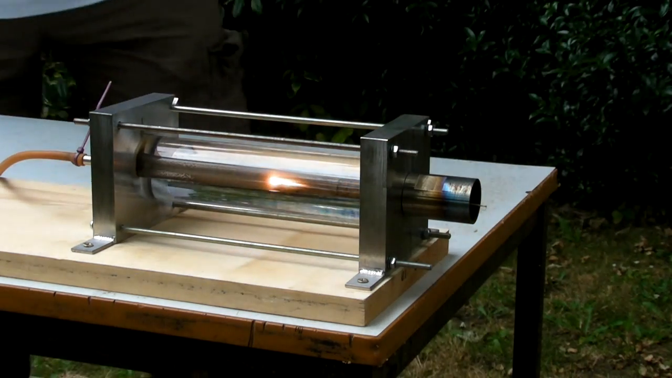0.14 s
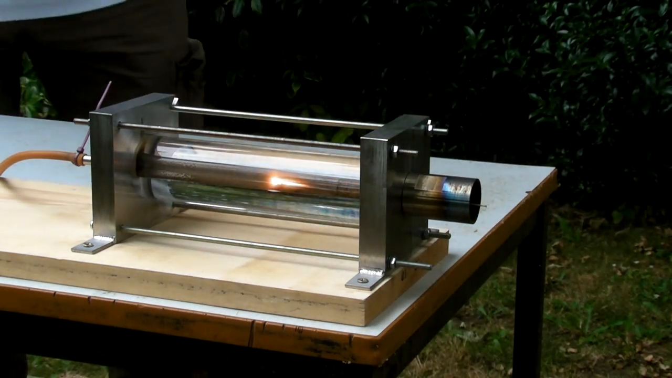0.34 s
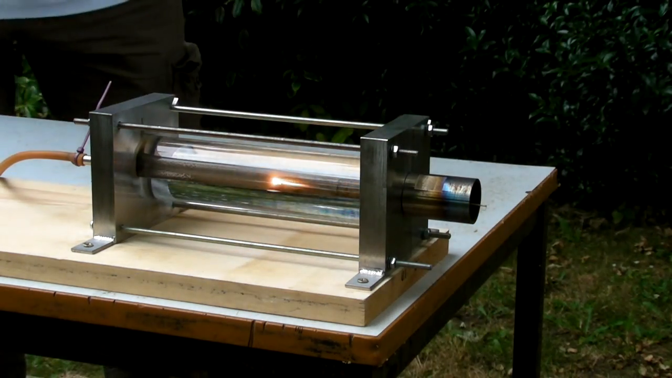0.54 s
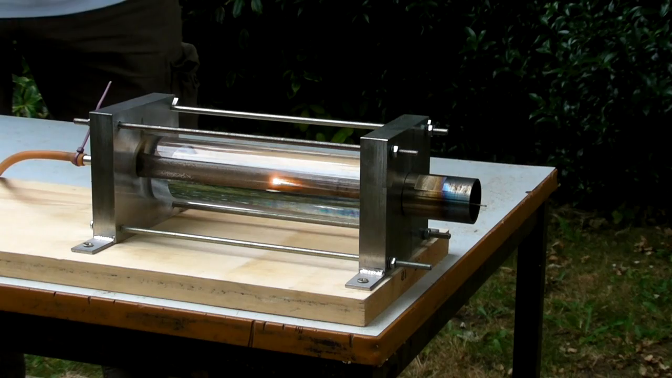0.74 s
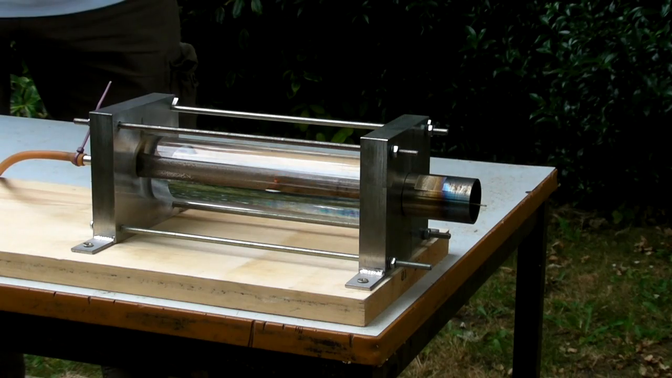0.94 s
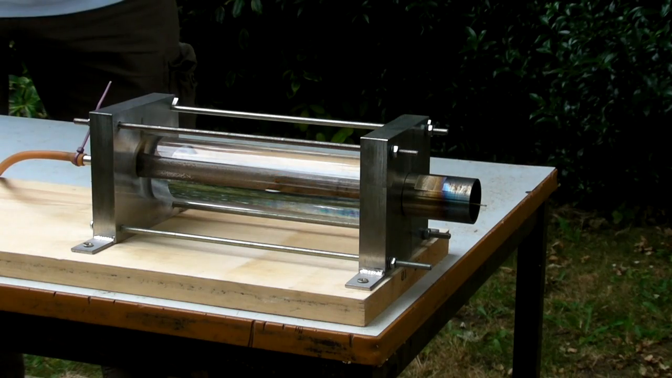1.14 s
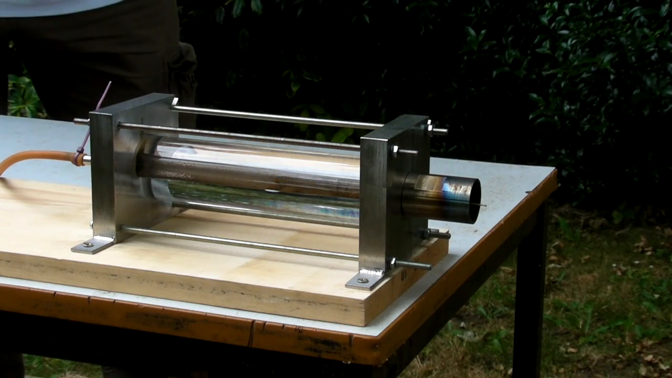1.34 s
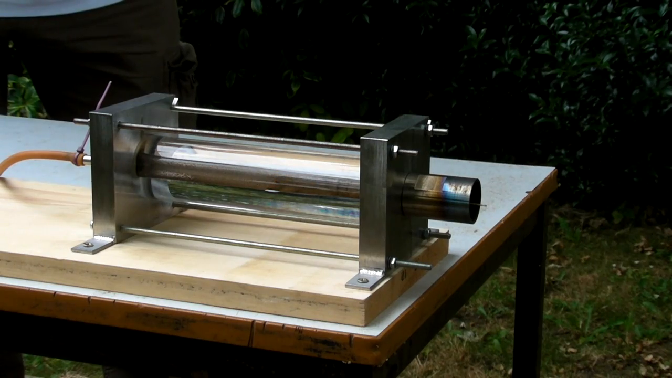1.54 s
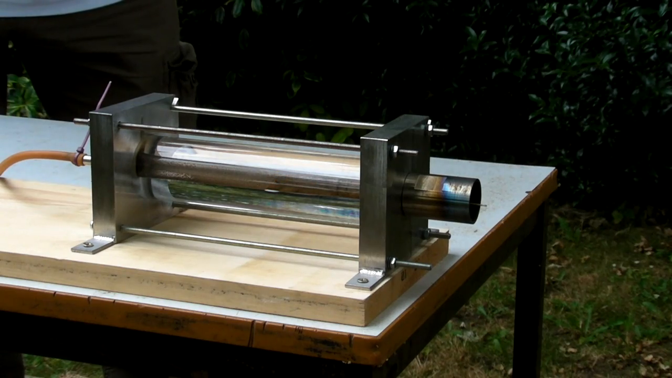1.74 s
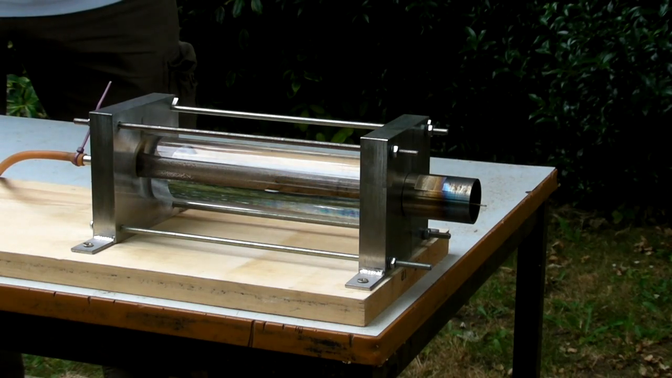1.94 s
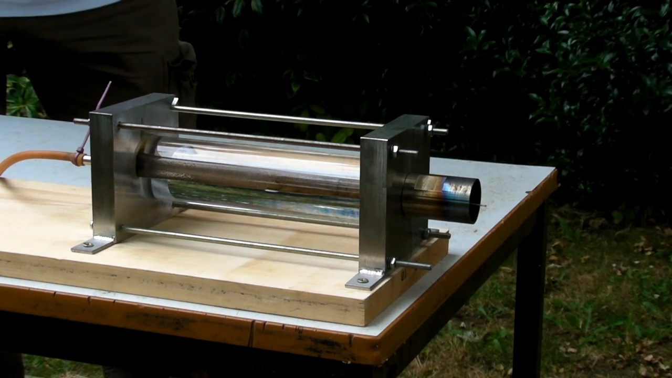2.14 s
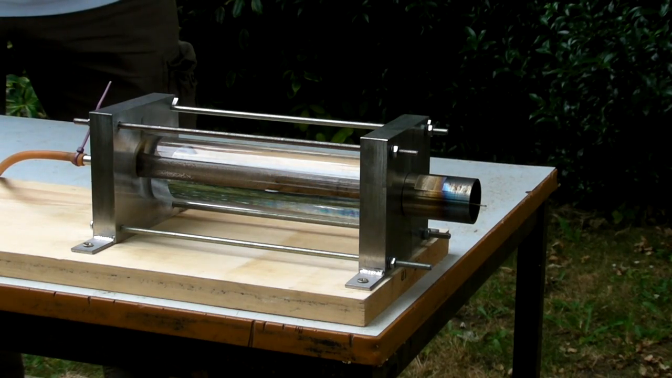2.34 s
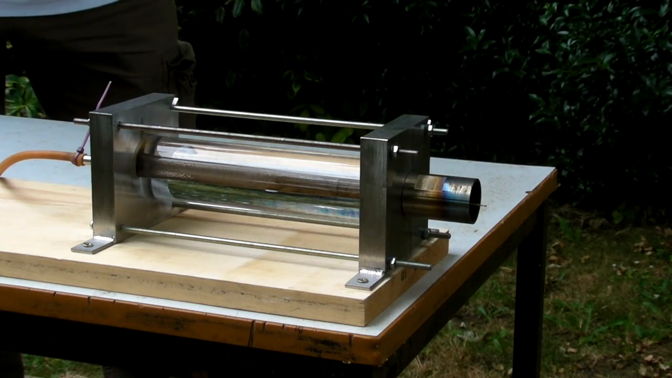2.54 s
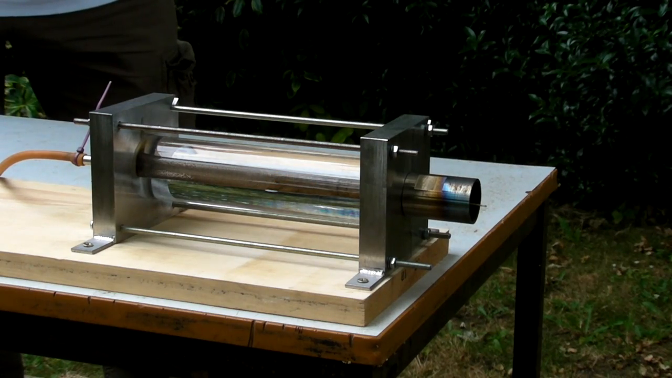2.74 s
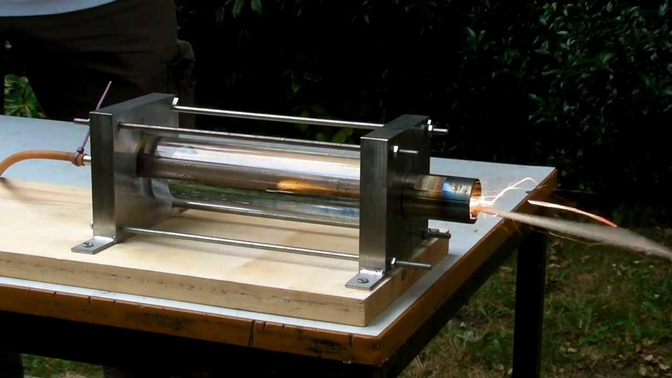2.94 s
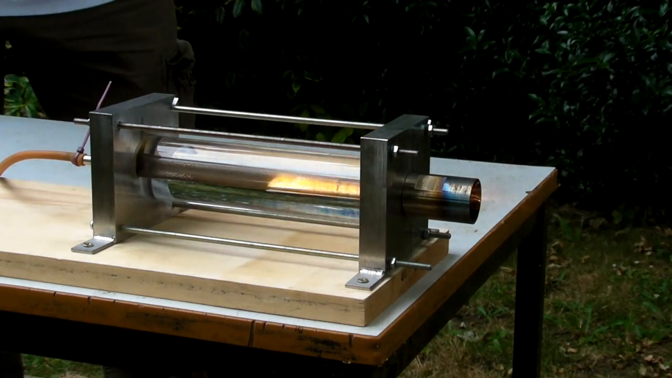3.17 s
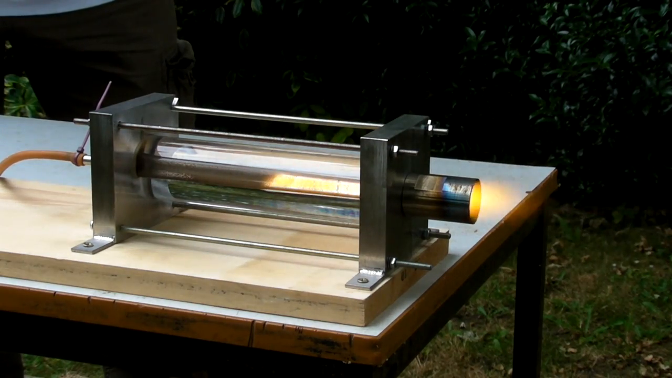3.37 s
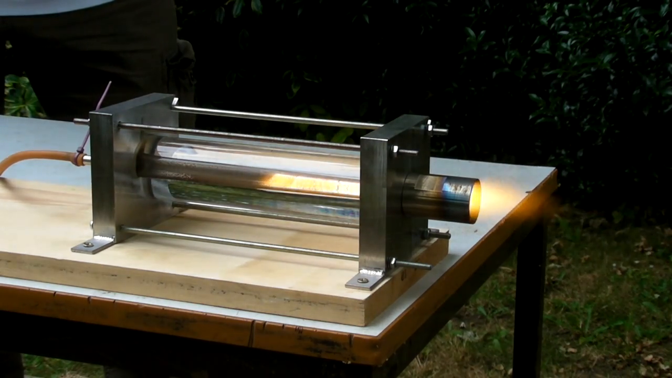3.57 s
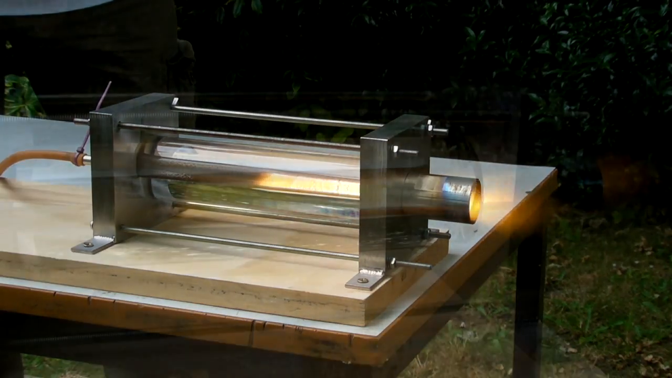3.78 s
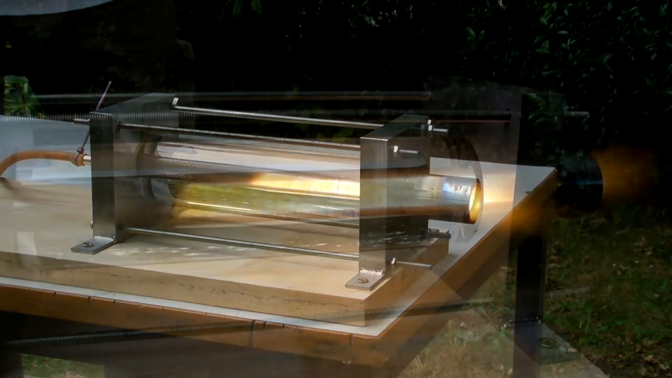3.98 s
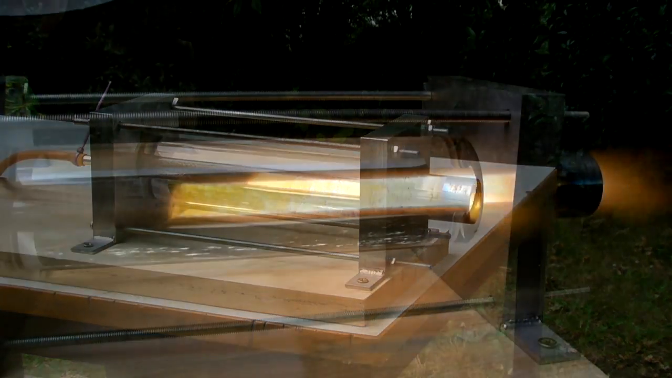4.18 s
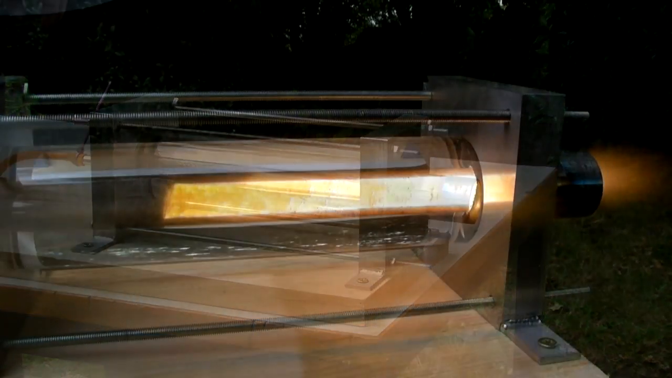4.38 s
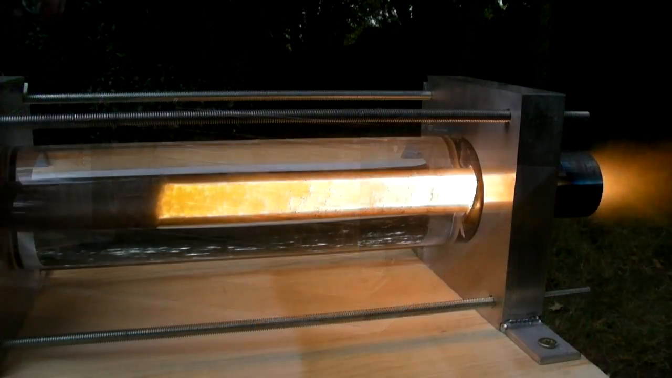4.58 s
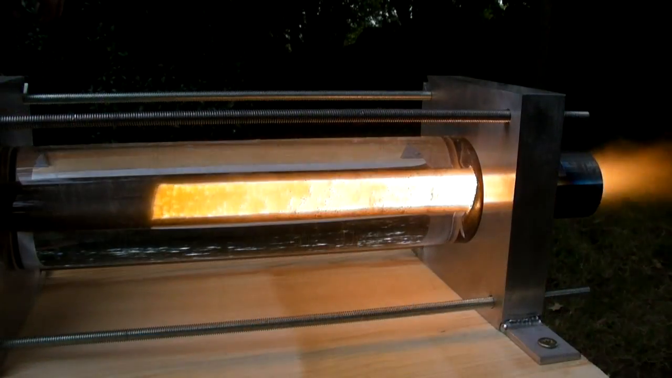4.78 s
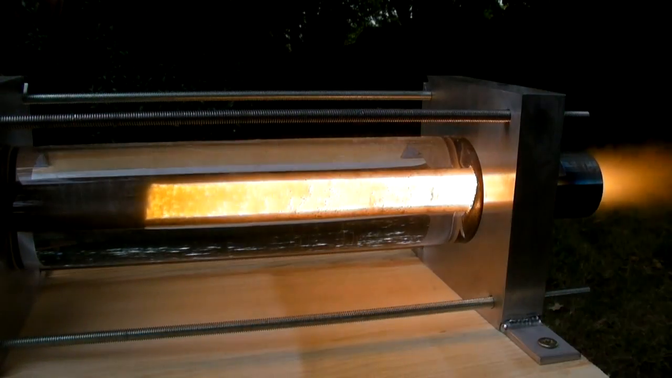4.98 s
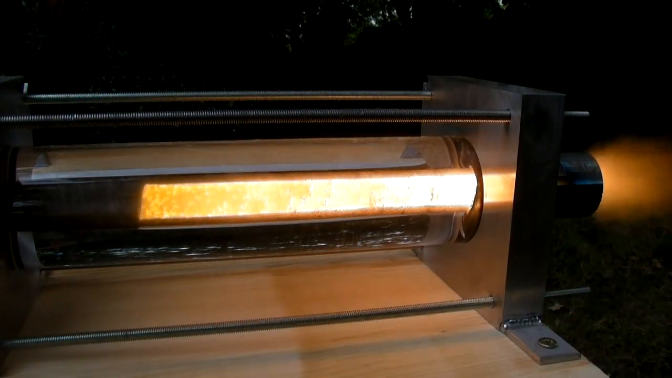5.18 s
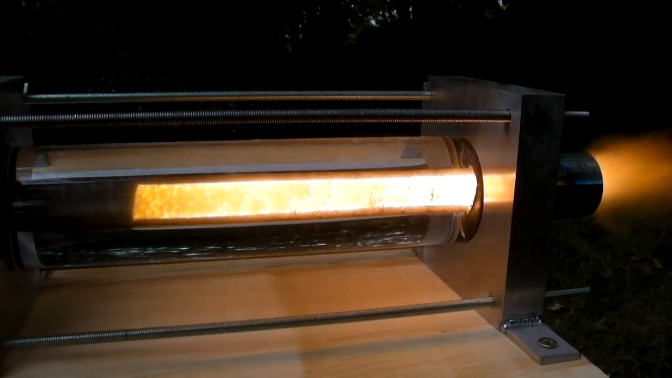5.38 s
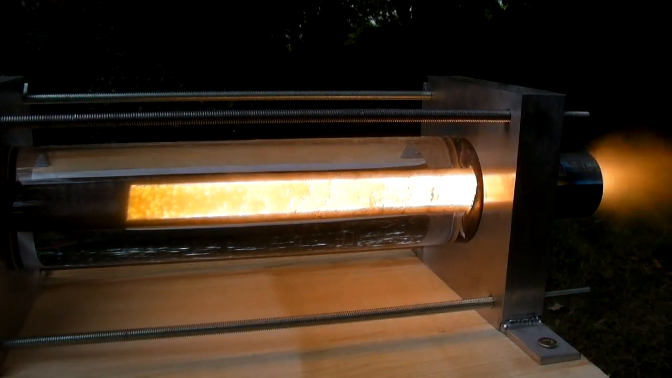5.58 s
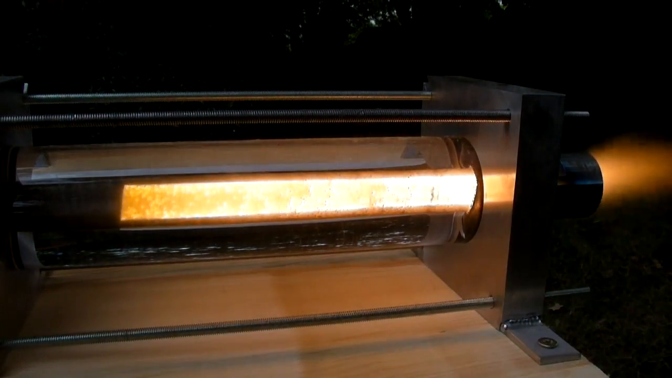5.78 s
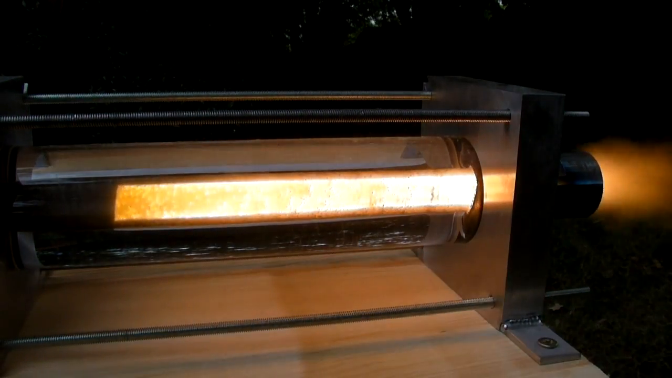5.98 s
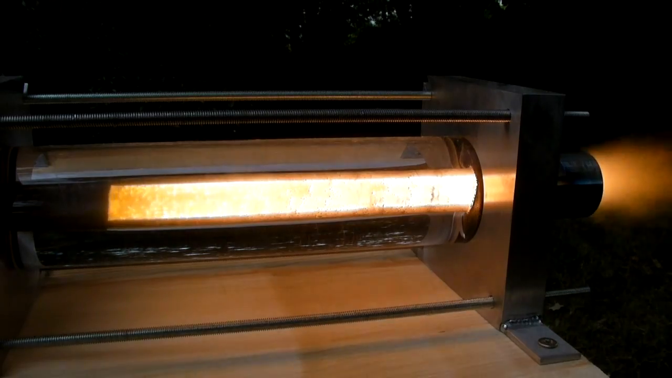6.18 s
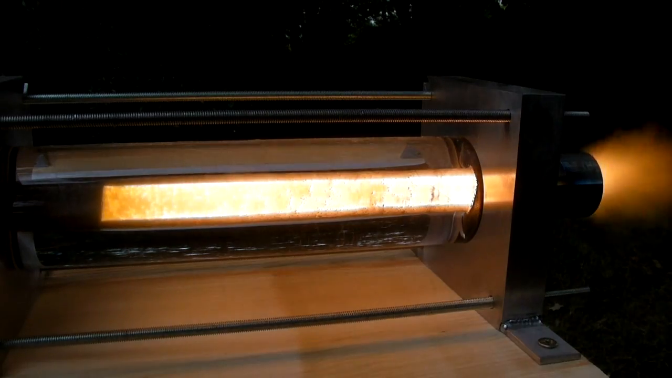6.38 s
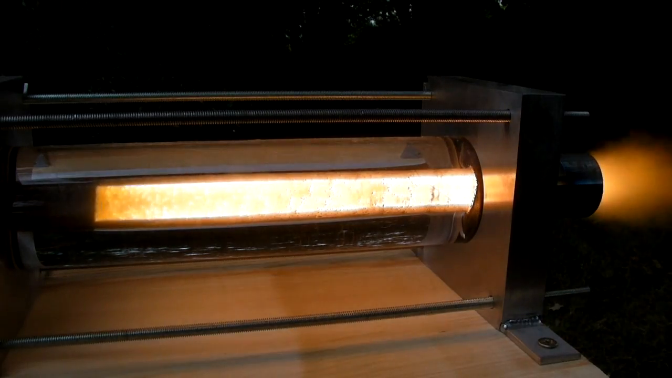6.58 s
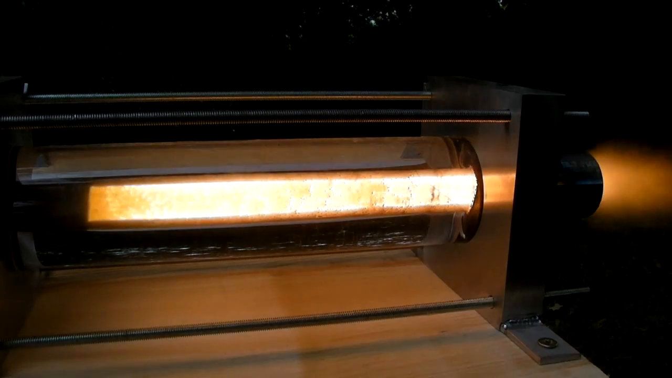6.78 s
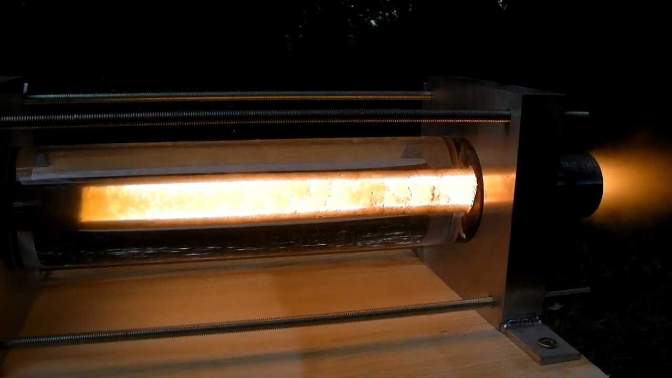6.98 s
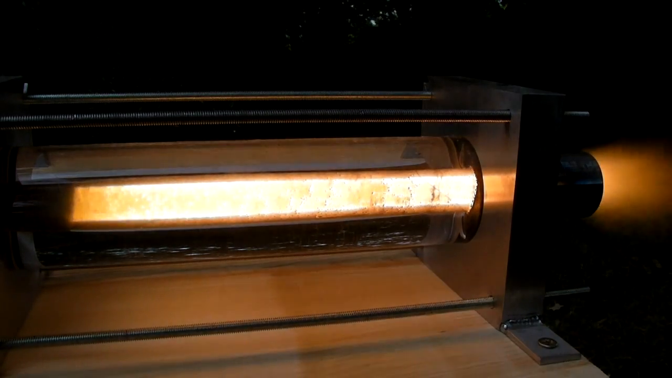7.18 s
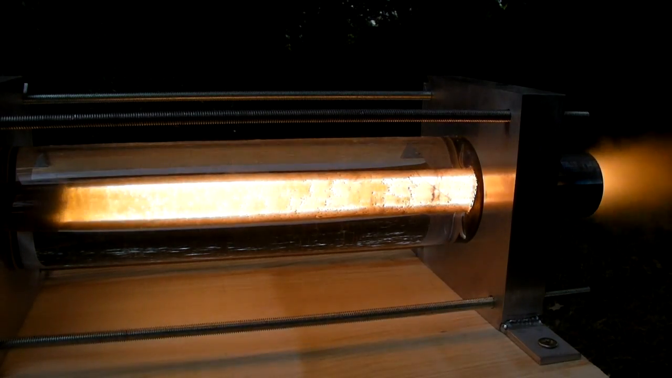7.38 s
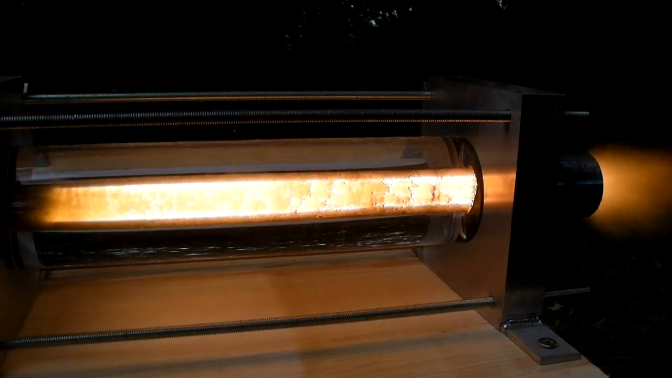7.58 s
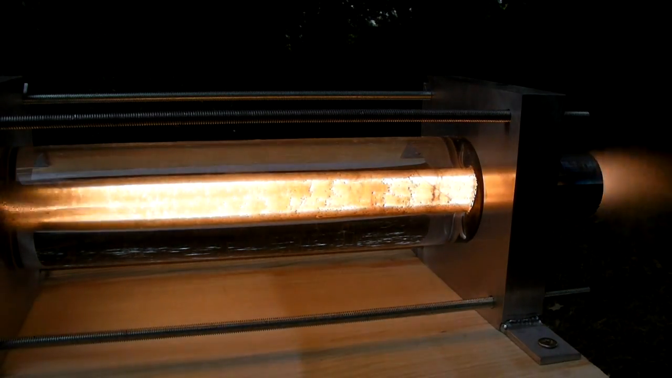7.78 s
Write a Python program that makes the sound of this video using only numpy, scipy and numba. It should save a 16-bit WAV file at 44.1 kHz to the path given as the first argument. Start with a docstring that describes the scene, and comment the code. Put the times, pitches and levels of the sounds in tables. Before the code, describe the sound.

From 0 to 0.5 s, sharp dry crackles and gritty clacks come irregularly close by over very faint traffic and leaves; a few scattered ticks follow until 1 s. Then it is almost silent, with tiny falling bird whistles from 2.2 s and five quick, faint hollow taps near 2.45 s. At 2.9 s a valve clacks and squeals thinly; just after 3 s gas bursts out in a loud puff, drops briefly, then surges and lights by 3.3 s into a harsh, clipped, bright hiss with rumble. A wavering chamber howl, around 700 to 750 Hz, swells in. Between 3.5 and 4.8 s this dissolves into a closer, somewhat quieter flame roar, airy and flickering. Fluttering whistles ride on it, one strong and climbing slowly from 5.4 s, turning rough near 7 s; a higher stuttering whistle joins after 7.15 s. At 7.8 s the whistle flicks upward and everything blasting stops, leaving faint garden air.

```python
"""A garden bench with a small rocket motor: dry crackles (bursts of grit), far birds (gliding tones), soft taps.
A valve clacks and squeals, then gas rushes and lights: noise around a moving peak, with treble and rumble.
The chamber howls on its pipe note. The sound dissolves to a closer spot, where the roar flickers in bands
of noise and the nozzle whistles in fluttering tones. Traffic and leaves lie behind; the camera clips the loudest."""
import sys
import numpy as np
from scipy import signal
from scipy.fft import rfft, irfft
from scipy.io import wavfile
from scipy.ndimage import uniform_filter1d
from numba import njit

SR = 44100
rng = np.random.default_rng(int(sys.argv[2]) if len(sys.argv) > 2 else 0)


def ratio(d):
    """dB to gain"""
    e = np.asarray(d, float) / 20
    return 10 ** e


def materialize(psi):
    """Save the field psi as 16-bit PCM at rate SR to the path in sys.argv[1].

    A 1-D psi becomes a single channel; in a 2-D psi each row is a channel.
    """
    bounded = np.clip(np.atleast_2d(psi).T, -1, 1)
    quanta = np.round(bounded * 32767).astype(np.int16)
    wavfile.write(sys.argv[1], SR, quanta)


N = 344862
T = np.arange(N) / SR
FREQS = np.maximum(np.arange(N // 2 + 1) * SR / N, 1)

# How the close roar moves, shared with the whistles that ride on it.
# columns: time_s, level_db, treble_db (against the level)
ROAR_MOVES = [(3.8, -17, -3), (4.52, -22.5, -2), (4.67, -19.5, -2), (5.08, -21, 1), (5.34, -24.5, -1),
              (5.43, -23, 2), (5.47, -20, 0), (5.65, -22.5, -0.5), (5.75, -18, -0.5), (5.89, -24.5, 0.5),
              (6.1, -19, -4.5), (6.22, -23, -1.5), (7.05, -19, -2), (7.46, -23.5, 2), (7.82, -18.5, -5.5)]


def unit(x):
    """Scale to rms 1."""
    return x / np.sqrt(np.mean(x ** 2))


def shape(points):
    """Gain at every frequency from (Hz, dB) points."""
    hz, db = np.transpose(points)
    return ratio(np.interp(np.log(FREQS), np.log(hz), db))


def colour(x, points):
    """Filter by (Hz, dB) points."""
    return irfft(rfft(x) * shape(points), N)


def hiss(points):
    """Noise of rms 1 with the given spectrum."""
    return unit(colour(rng.standard_normal(N), points))


def curves(table):
    """A gate that is open while the table lasts, then each column over time."""
    s, *columns = np.transpose(table)
    edge_s = .004
    gate = np.clip(np.minimum(T - s[0], s[-1] + edge_s - T) / edge_s, 0, 1)
    return [gate] + [np.interp(T, s, c) for c in columns]


def ramp(start_s, end_s):
    """0 before, 1 after, straight between."""
    return np.clip((T - start_s) / max(end_s - start_s, 1e-3), 0, 1)


@njit
def svf(x, hz, width):
    """State-variable band-pass with moving centre and width, gain 1 at the centre."""
    y, b, l = np.empty(len(x)), 0., 0.
    for i in range(len(x)):
        g, k = np.tan(np.pi * hz[i] / SR), width[i] / hz[i]
        v = (b + g * (x[i] - l)) / (1 + g * (g + k))
        b, l, y[i] = 2 * v - b, l + 2 * g * v, k * v
    return y


def band(hz, width_hz):
    """Noise in a moving resonance applied twice, rms near 1."""
    width = np.clip(width_hz, 5, 9000) + 0 * T
    once = svf(rng.standard_normal(N), hz, width)
    return svf(once, hz, width) * np.sqrt(2 * SR / np.pi / width)


def walk(rate):
    """Random levels held 1 / rate s and smoothed twice; spread 1."""
    k = int(SR / rate)
    steps = np.repeat(rng.standard_normal(N // k + 1), k)
    return unit(uniform_filter1d(uniform_filter1d(steps, k), k)[:N])


def echoes(x, table, dull_hz, thin_hz):
    """Direct sound plus short, duller reflections, which comb the spectrum."""
    late = sum(ratio(db) * np.exp(-2j * np.pi * FREQS * ms / 1000) for ms, db in table)
    # soft ground returns less of the bass, and a little early
    comb = 1 + late / np.sqrt(1 + (FREQS / dull_hz) ** 2) / (1 - 1j * thin_hz / FREQS)
    return irfft(rfft(x) * comb, N)


def spread(x, side_points):
    """Left and right differ by a smeared, later copy of the sound."""
    decay_ms = 7.7
    smear = rng.standard_normal(2048) * np.exp(-np.arange(2048) / (decay_ms * SR / 1000))
    late = signal.fftconvolve(x, smear / np.linalg.norm(smear))[:N]
    side = colour(late, side_points)
    return np.array([x + side, x - side])


def garden():
    """Distant traffic and leaves: two filtered noises that swell apart, the bass unevenly."""
    # spectrum of the leaves and air; columns: pitch_hz, level_db (per Hz)
    air = [(20, -28), (60, -4.5), (130, -1.5), (170, -6.5), (600, -9.5), (2500, -14.5), (4300, -16),
           (5100, -21.5), (15500, -31.5)]
    # spectrum of the far traffic; columns: pitch_hz, level_db (per Hz)
    traffic = [(25, -14), (70, 2), (150, 4.5), (260, -27.5)]
    # side against middle; columns: pitch_hz, level_db
    side_tone = [(60, -8), (200, -7), (400, -2), (15000, -0.5)]

    def layer():
        """One draw of air and traffic, each with its own swell."""
        leaves = hiss(air) * ratio(0.34 * walk(5.13))
        return leaves + ratio(-9 + 1.4 * walk(6.9)) * hiss(traffic)

    mid, side = layer(), colour(layer(), side_tone)
    return ratio(-51) * np.array([mid + side, mid - side])


def cracks():
    """Each is a run of grit in a band that starts fast, the long ones more gently, and stops short."""
    # crackles, scrapes and clacks; columns: start_s, level_db, centre_hz, length_ms
    loud_cracks = [(0, -33, 3450, 15), (.027, -33, 4440, 10), (.07, -40, 6900, 27), (.177, -35, 10000, 3),
                   (.195, -31, 5970, 3.8), (.279, -22.5, 2500, 3.8), (.28, -28, 684, 8.5),
                   (.35, -25, 4280, 8.8), (.364, -30, 4900, 3), (.379, -37, 1150, 30),
                   (.379, -34.5, 5900, 55), (.405, -24.5, 1600, 9), (.412, -21.5, 1630, 13),
                   (.425, -23, 3000, 6.3), (.449, -38.5, 4200, 13), (.469, -32, 3000, 4),
                   (.478, -34.5, 3200, 18), (.44, -43, 2500, 60), (.49, -44, 4500, 45),
                   (.592, -35, 3500, 5.1), (.865, -46, 5000, 4.5), (.939, -37.5, 5900, 2.6),
                   (.98, -36, 2100, 4), (1.85, -52, 2500, 76), (2.872, -35, 5984, 26),
                   (2.873, -41, 1800, 22), (2.892, -34, 4000, 6), (2.893, -33, 1250, 6),
                   (2.977, -35, 900, 5), (2.982, -40.5, 846, 59)]
    out, t_ms = np.zeros(N), np.arange(4096) / SR * 1000
    # twelve faint chance crackles rustle among the loud ones, between 0.1 and 1.3 s
    chances = rng.random((12, 4))
    faint = [(.1 + a * 1.2, -53.5 + 4 * b, 4000 + 4000 * c, 3 + 10 * d) for a, b, c, d in chances]
    for s, db, hz, ms in loud_cracks + faint:
        fine, coarse = rng.standard_normal((2, 4096))
        # strong random level swings break the noise into grains, which are then squashed
        grit = np.tanh(fine * ratio(38 * uniform_filter1d(coarse, size=30)) / 6)
        # band width in octaves: 0.87 at 1 kHz, wider for higher cracks
        octaves = max(0.87 + 0.43 * np.log2(hz / 1000), .2)
        half = 2 ** (octaves / 2)
        edges_hz = [hz / half, min(hz * half, SR / 2.2)]
        sos = signal.butter(2, edges_hz, "bandpass", fs=SR, output="sos")
        rise = np.minimum(t_ms / (0.93 + 0.11 * ms), 1)
        fall = ratio(-9 * t_ms / ms - 3 * (t_ms / ms) ** 4)
        tail = ratio(-21.5 - .5 * t_ms)
        hold = rise * fall + tail
        burst = unit(signal.sosfilt(sos, grit * hold)) * np.sqrt(np.mean(hold ** 2))
        out[int(s * SR):int(s * SR) + 4096] += ratio(db) * burst
    return out


def birds():
    """Far, thin falling whistles: gliding sines that flutter and break up."""
    # columns: start_s, length_s, start_hz, end_hz, level_db
    calls = [(2.19, .07, 5250, 4950, -61), (2.49, .06, 6700, 6400, -63), (2.51, .06, 5700, 5550, -58),
             (2.723, .09, 5750, 5700, -60), (2.83, .09, 5720, 5660, -55)]
    out = np.zeros(N)
    for s, length, start_hz, end_hz, db in calls:
        u = np.clip((T - s) / length, 0, 1)
        hz = start_hz + (end_hz - start_hz) * u + 40 * walk(90)
        arch = np.abs(np.sin(np.pi * u)) ** .5 * (u < 1)
        out += ratio(db + 4 * walk(120)) * arch * np.sin(2 * np.pi * np.cumsum(hz) / SR)
    return out


def knocks():
    """A far, hollow object tapped five times, hardest in the middle: dying sines."""
    # ringing notes of the object; columns: pitch_hz, t60_s (time to fall 60 dB), level_db
    ringing = [(1000, 0.017, 6.5), (2500, 0.034, 0)]
    middle_s, gap_s = 2.446, .023
    out = np.zeros(N)
    for k in np.arange(-2, 3):
        t = np.maximum(T - middle_s - k * gap_s, 0)
        tap_db = -45 - 1.1 * k ** 2
        out += sum(ratio(tap_db + db - 60 * t / t60) * np.sin(2 * np.pi * hz * t) for hz, t60, db in ringing)
    return out


def jet():
    """Turbulent jet whose noise peak moves with the flow; treble and rumble come as it lights."""
    # gas flow; columns: time_s, level_db, peak_hz
    flow = [(2.94, -64, 2600), (3.006, -42.5, 2500), (3.024, -20, 2440), (3.064, -7, 2920),
            (3.112, -2.5, 3450), (3.136, -19.5, 2976), (3.155, -15.5, 2900), (3.258, -10, 3200),
            (3.31, -7.5, 3650), (3.35, -8.5, 4140), (3.39, -8.5, 4660), (3.556, -7.5, 4620),
            (4.7, -15.5, 4000)]
    # spectrum of the steady noise under the peak; columns: pitch_hz, level_db (per Hz)
    body = [(530, -47), (900, -4.5), (1550, -3.5), (1760, -1), (2000, 0.5), (2600, -1), (3850, 2.5),
            (10300, -13), (15500, -41)]
    # spectrum of the rumble; columns: pitch_hz, level_db (per Hz)
    rumble_tone = [(20, -3), (60, -32), (200, -1.5), (500, 3), (900, 14), (1400, -9)]
    # chamber resonances while cold; columns: pitch_hz, width_hz, level_db (against the jet level)
    cold_modes = [(1005, 55, -23.5), (1707, 105, -15), (2080, 80, -22.5)]
    gate, level_db, hz = curves(flow)
    opens = ramp(3.006, 3.024)                         # the valve opens
    puff = ramp(3.03, 3.07) - ramp(3.115, 3.15)        # first cold puff
    warm = ramp(3.2, 3.4)                              # the chamber warms
    full = ramp(3.25, 3.63)                            # flame fills the chamber
    lit = ramp(3.27, 3.38)                             # flame catches
    core = ramp(3.13, 3.15) - ramp(3.38, 3.48)         # tight core of the peak

    width_hz = 960 + 570 * puff + 2800 * full
    peak = ratio(-2.5) * band(hz, width_hz) + ratio(-5.5) * hiss(body)
    # warming raises the resonances by this share, and the full flame covers them
    sharp = 1 + 0.052 * warm
    resonances = sum(ratio(db) * band(f * sharp, w) for f, w, db in cold_modes)
    peak = peak + ratio(-13 * full) * resonances
    peak = peak + ratio(-6.5) * core * band(hz, 700)

    # against the level, and strongest against it while the valve is barely open
    treble_db = -30 + 9 * puff + 23 * lit + 33 * (1 - opens) + 3.5 * full
    treble = hiss([(5000, -19.0), (8000, -1.5), (12000, -0.5), (15500, -7.5)])
    rush = ratio(level_db + 0.67 * walk(60)) * (peak + ratio(treble_db) * treble)
    # the puff thumps 12 ms late, then the rumble grows as pressure builds
    thump = np.interp(T - .012, T, puff)
    rumble_db = -46 + 13.5 * thump + 23 * ramp(3.03, 3.59)
    return gate * rush + gate * opens * ratio(rumble_db) * hiss(rumble_tone)


def leak():
    """Gas squeals through the barely open valve: noise in two narrow resonances."""
    # first thin squeal; columns: time_s, level_db
    squeal = [(2.945, -57), (2.96, -44), (3.015, -30), (3.03, -54)]
    # resonances of the gap; columns: pitch_hz, width_hz, level_db
    gap_modes = [(7450, 500, -4), (8330, 400, -2.5)]
    gate, level_db = curves(squeal)
    return gate * ratio(level_db) * sum(ratio(db) * band(hz + 0 * T, width) for hz, width, db in gap_modes)


def howl():
    """The burning chamber sings on its length mode, wavering in pitch, with a skirt of noise."""
    # pitch before the waver; columns: time_s, pitch_hz
    pitch = [(3.38, 689.5), (3.46, 708.7), (3.49, 735), (3.55, 748.6), (3.61, 736), (3.7, 748), (3.77, 765),
             (3.82, 752), (4.05, 734), (4.3, 734), (4.42, 716), (4.65, 718)]
    # the note and its overtones; columns: multiple (times the pitch), level_db
    orders = [(1, 0.5), (2, -11.5), (3, -8)]
    t = np.maximum(T - 3.366, 0)
    hz = curves(pitch)[1]
    # swells in from 15 dB lower, then sags 3.5 dB each second
    level_db = -11.5 - 15 * np.exp(-t / 0.065) - 3.5 * t
    waver = 1 + .006 * walk(40) + .007 * walk(150)
    phase = 2 * np.pi * np.cumsum(hz * waver) / SR
    # each step up the overtones fades 6 dB per second faster
    tone = sum(ratio(db - (k - 1) * 6 * t) * np.sin(k * phase) for k, db in orders) * np.sqrt(2)
    skirt = ratio(-13) * band(hz * 1.02, 130.)
    return (t > 0) * ratio(level_db + 1.1 * walk(25)) * (tone + skirt)


def roar():
    """Flame roar in overlapping bands of noise that gust together and flicker alone."""
    # spectrum of the roar; columns: pitch_hz, level_db (per Hz)
    roar_tone = [(24, -50), (45, -44), (110, -18), (300, -14), (420, -14), (600, -13), (1250, -12.5),
                 (1700, -16), (2160, -13.5), (2700, -5), (3400, -10), (6300, -3), (7700, -11),
                 (10500, -14.5), (12700, -11), (15500, -20.5)]
    gate, level_db, treble_db = curves(ROAR_MOVES)
    usual_db, usual_treble_db = level_db[T > 5].mean(), treble_db[T > 5].mean()
    body, gust, out = shape(roar_tone), walk(40), 0
    # the level counts for the part from 4.7 to 7.5 kHz
    heard = (FREQS > 4700) & (FREQS < 7500)
    scale = np.sqrt(np.sum(body[heard] ** 2) / len(FREQS))
    centres_hz = np.array([20, 300, 1000, 2500, 5500, 12000])
    for k, hz in enumerate(centres_hz):
        this_band = np.arange(len(centres_hz)) == k
        share = np.sqrt(np.interp(np.log(FREQS), np.log(centres_hz), this_band))
        # the level follows the gusts more at higher pitch
        follow = min(hz / 4500, 1)
        db = follow * (level_db - usual_db + 0.89 * gust) + 0.6 * walk(28) + 0.77 * walk(5)
        # the low roar thins as the bore burns wider, the lowest band most
        db = db - (1 - follow) ** 4 * 1.4 * (T - 6)
        if hz == centres_hz[-1]:
            # the top spits in short puffs
            db = db + treble_db - usual_treble_db + 1.5 * walk(35)
        out = out + ratio(db) * irfft(rfft(rng.standard_normal(N)) * body * share, N)
    return gate * ratio(usual_db - 0.2) * out / scale


def whistle(gain, hz, width_hz, octave_db):
    """An edge tone at the nozzle: a fluttering note and octave in rough noise; it stutters while loose."""
    # a whistle this narrow keeps its full note, one this wide is all noise
    locked_hz, loose_hz = 100, 260
    loose = np.clip((width_hz - locked_hz) / (loose_hz - locked_hz), 0, 1)
    flutter_hz = width_hz * (.07 * walk(45) + .7 * walk(400))
    phase = 2 * np.pi * np.cumsum(hz + flutter_hz) / SR
    octave = ratio(octave_db) * ratio(3.9 * walk(200)) * np.sin(2 * phase)
    note = ratio(2.1 * walk(140)) * (np.sin(phase) + octave)
    rough = (ratio(-8) + loose / 2) * band(hz, 2.5 * width_hz)
    stutter = ratio(.5 * walk(14) + 6 * loose * walk(45))
    return gain * stutter * (np.sqrt(1 - loose) * note + rough)


def whistles():
    """Three edge tones swell with the roar; a high one comes in bursts on a slowly climbing pitch."""
    # three notes; columns: time_s, pitch_hz, level_db (against the roar), width_hz (sets flutter and noise)
    first_note = [(4.2, 3170, -14, 110), (4.35, 3190, -3, 100), (4.95, 3240, -5.5, 95),
                  (5.35, 3270, -10, 100)]
    low_note = [(4.6, 2330, -16, 180), (4.9, 2400, -4.5, 150), (5.43, 2560, -2, 170), (5.445, 2570, 0, 60),
                (5.8, 2620, 2, 55), (6.1, 2682, 3, 55.3), (6.55, 2724, 2.5, 65.3), (6.7, 2774, 1, 200),
                (7.05, 2900, -4, 300), (7.3, 3080, -4, 302)]
    last_note = [(7.58, 3050, -50.5, 251), (7.775, 3180, 0.5, 240), (7.786, 3600, -7, 100),
                 (7.82, 3230, 5.5, 70)]
    # the high one stutters, holds, and falters at the end; columns: start_s, length_s, level_db
    bursts = [(7.165, 0.023, -18.5), (7.193, .022, -18), (7.242, .018, -19), (7.292, 0.45, -17),
              (7.74, 0.031, -19), (7.771, 0.015, -14.5)]
    roar_db, out = curves(ROAR_MOVES)[1], 0
    for table, octave_db in ((first_note, -30), (low_note, -22), (last_note, -20)):
        gate, hz, db, width_hz = curves(table)
        out = out + whistle(gate * ratio(roar_db + db), hz, width_hz, octave_db)
    gain, edge_s = 0, 0.0055
    for s, length, db in bursts:
        end_s = s + length
        gain = gain + ratio(db) * (ramp(s, s + edge_s) - ramp(end_s, end_s + edge_s))
    since_first = np.maximum(T - bursts[0][0], 0)
    # climbs 200 Hz towards 4200 Hz, and flicks up as it breaks off
    hz = 4200 - 200 * np.exp(-since_first / .25) + 312 * ramp(7.775, 7.787)
    # its octave grows as the note settles
    octave_db = np.interp(T, (6.5, 7.4), (-33.5, -8))
    return out + whistle(gain, hz, 110, octave_db)


def scene():
    """First spot dissolving into the closer one, over the same garden."""
    # reflections of each spot; columns: delay_ms, level_db
    ground_echoes = [(2.832, -5), (3.029, -29)]
    bench_echoes = [(2.45, -4), (1.9, -18)]
    roar_echoes = [(3.43, -7.5), (1.635, -18.5), (5.85, -21)]
    # side against middle at each spot; columns: pitch_hz, level_db
    jet_side = [(60, -12), (380, -16), (900, -54), (2400, -21.5), (8000, -14), (15000, -8)]
    roar_side = [(60, -10), (700, -18.5), (2400, -16.5), (8000, -14), (15000, 0.5)]
    # tilt of the close spot; columns: pitch_hz, left_minus_right_db
    lean = np.array([(200, -0.5), (2400, -0.5), (5000, -3), (15000, -4.5)])
    near = ramp(3.54, 4.78)
    first = echoes(np.sqrt(1 - near) * jet(), ground_echoes, dull_hz=7000, thin_hz=603)
    first = first + leak() + (1 - near) ** 1.18 * howl()
    first = first + echoes(cracks(), bench_echoes, dull_hz=8000, thin_hz=500) + knocks() + birds()
    flame = echoes(np.sqrt(near) * roar(), roar_echoes, dull_hz=4000, thin_hz=696)
    left, right = spread(flame + whistles(), roar_side)
    # each side takes half of the tilt
    close = np.array([colour(left, lean * [1, .5]), colour(right, lean * [1, -.5])])
    return spread(first, jet_side) + close + garden()


def band_limit(x):
    """A steep low-pass at the top of the band."""
    return signal.sosfilt(signal.butter(12, 15730, fs=SR, output="sos"), x)


def record(dry):
    """The camera clips, has a narrow dip in the treble and cuts the top."""
    dip_hz, dip_width_hz, top_hz = 7860, 420, 15760
    hot = np.clip(dry, -.98, .98)
    dipped = np.array([c - .97 * svf(c, dip_hz + 0 * T, dip_width_hz + 0 * T) for c in hot])
    low_pass = signal.ellip(10, .2, 60, top_hz, fs=SR, output="sos")
    finished = signal.sosfilt(low_pass, dipped)
    return band_limit(finished)


dry = scene()
out = record(dry)
materialize(out)
```